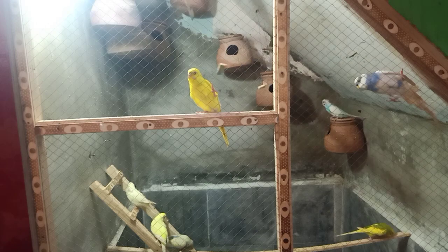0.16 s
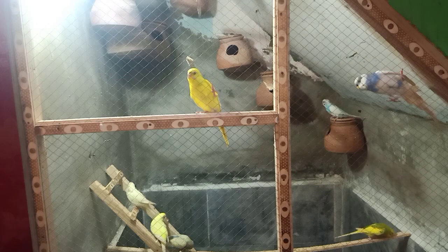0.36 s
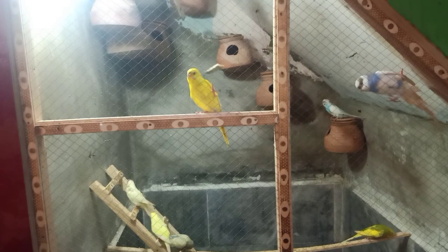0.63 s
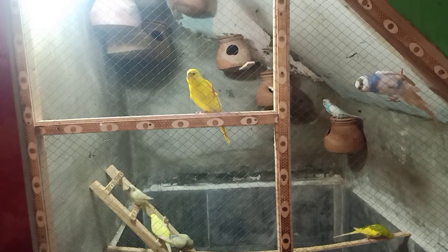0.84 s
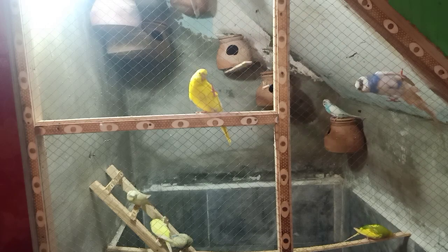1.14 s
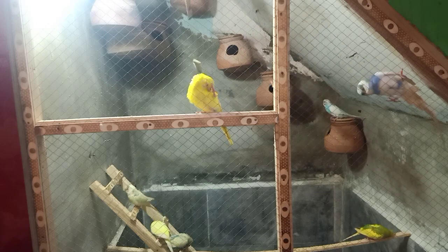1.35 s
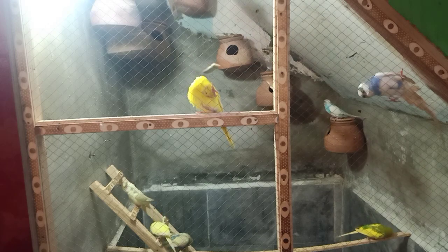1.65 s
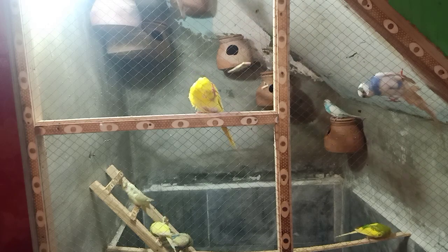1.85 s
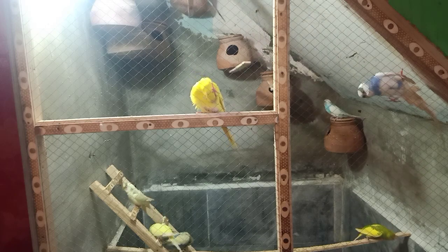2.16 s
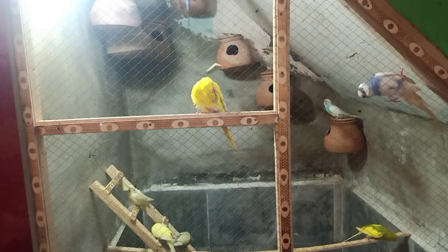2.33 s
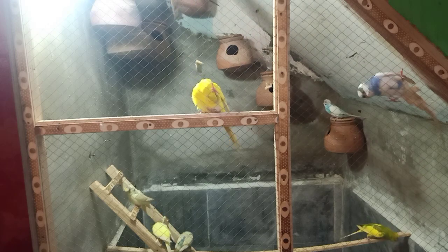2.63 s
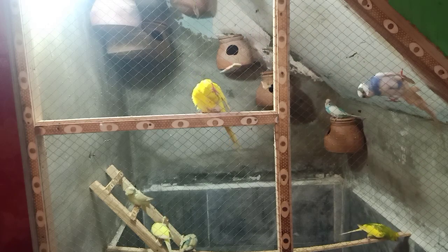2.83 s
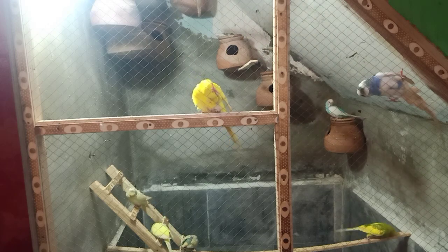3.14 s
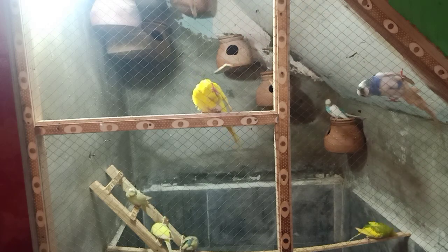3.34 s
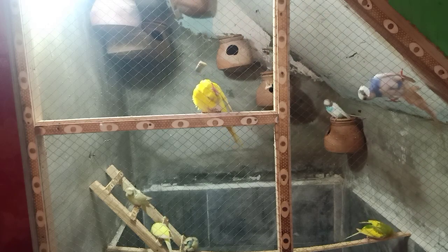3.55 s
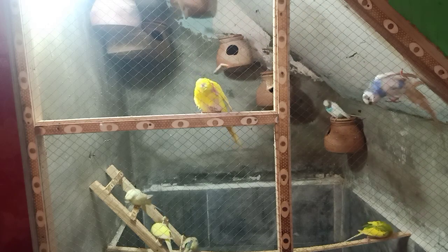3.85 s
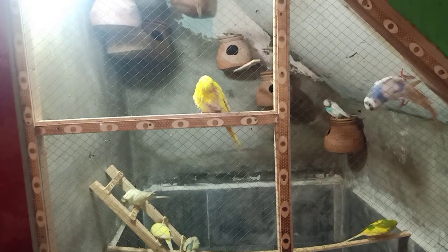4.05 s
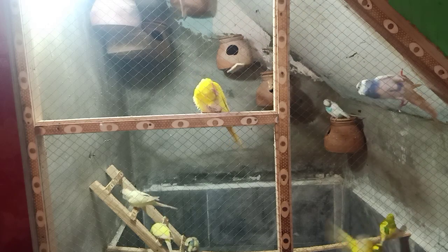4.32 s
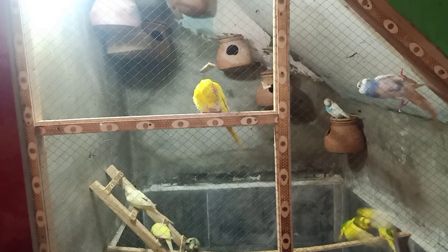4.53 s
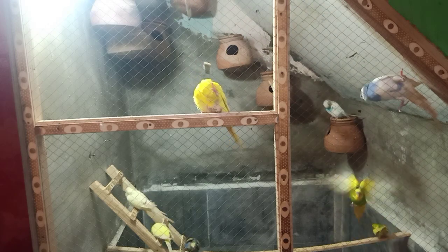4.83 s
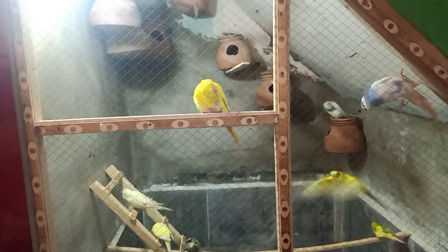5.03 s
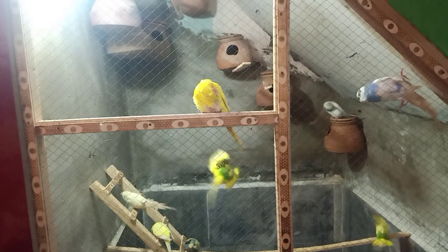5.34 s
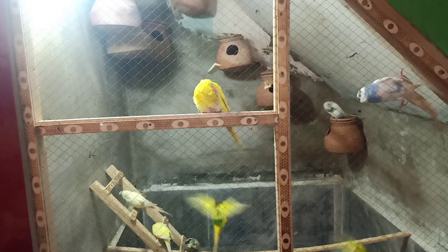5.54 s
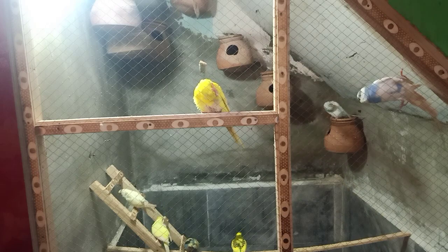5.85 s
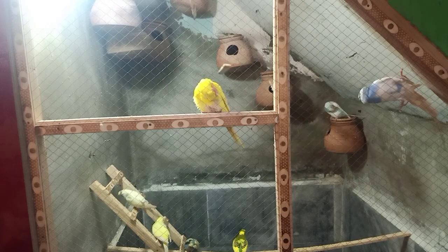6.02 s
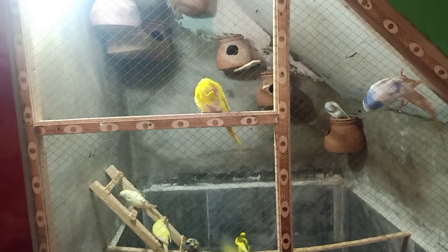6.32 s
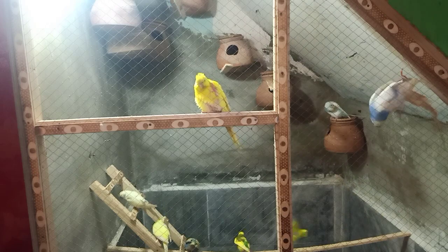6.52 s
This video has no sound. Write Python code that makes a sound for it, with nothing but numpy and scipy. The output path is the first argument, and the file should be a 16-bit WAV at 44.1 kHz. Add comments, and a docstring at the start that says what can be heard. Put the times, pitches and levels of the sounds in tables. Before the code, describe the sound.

Budgerigars chirp, rasp and cluck in a small echoing aviary, then call louder as wings flutter, over a faint hum.

```python
"""Budgerigars call in a small, hard-walled aviary, over a faint machine hum and a wash of distant noise.
First a bird warbles and rasps: its voice organ, the syrinx, sings for a whistle and slaps shut for a rasp.
Soft chirps and rasps follow, then two runs of clucks with a brief flutter of wings between them.
From about 4.4 s come a longer warble, harsh rasps and a burst of high chirps, while birds flutter
across the cage to the end, with puffs of air and a few scuffs of feathers and claws."""
import sys
import numpy as np
from scipy import signal
from scipy.fft import rfft, irfft, next_fast_len
from scipy.io import wavfile
from scipy.ndimage import uniform_filter1d

SR = 44100
rng = np.random.default_rng(int(sys.argv[2]) if len(sys.argv) > 2 else 0)


def to_wav(sig):
    """Store sig (one row per channel, or 1-D mono) as 16-bit WAV at the path in sys.argv[1].

    Samples outside -1..1 are clipped; the rate is SR.
    """
    pcm = np.clip(np.atleast_2d(sig), -1, 1) * 32767
    pcm = np.round(pcm).astype(np.int16)
    wavfile.write(sys.argv[1], SR, pcm.T)  # frames by channels


N = 294588

# tone of the birds' calls at the microphone, dull above 7 kHz: f/Hz, level/dB
CALL_TONE = [(500, -48), (1200, -26.5), (2200, -6.5), (3150, -3.5), (4150, -5), (5400, -6.5), (6150, -1.5),
             (6900, -11), (7800, -29), (9400, -37.5), (11800, -39), (15000, -37)]
# bursts of wing beats: t/s, length/s, air puffs/dB, feather whirr/dB
WING_BURSTS = [(3.10, .33, -65, -55.5), (4.379, 0.43, -51.5, -70), (4.651, 0.64, -52.5, -72),
               (5.295, 0.21, -56, -70), (5.448, 0.24, -65, -52), (5.611, .36, -53, -50.5),
               (5.909, 0.42, -54.5, -54), (6.269, 0.33, -57.5, -54), (6.503, 0.17, -64, -56)]


def whistle(hz, level_db, rough, overtones_db, even_db=-7):
    """The syrinx sings an almost pure, quavering tone; when pressed it buzzes and hisses."""
    size = len(hz)
    quaver = 0.028 * (0.48 + 2.02 * rough) * wander(size, 300)
    phase = phase_of(hz * (1 + quaver))
    buzz = 1 + 0.25 * rough * np.sin(phase_of(850 * (1 + 0.312 * wander(size, 332))))
    # the windpipe favours odd multiples of the pitch; even_db turns the even ones down or up
    overtones = sum(gain_of(read(CALL_TONE, k * hz) + even_db * (k % 2 == 0)) * np.cos(k * phase)
                    for k in range(2, 5))
    tone = np.sqrt(2) * np.cos(phase) + 1.21 * gain_of(overtones_db) * overtones
    hiss = rough * gain_of(-11) * coloured(rng.standard_normal(size), CALL_TONE, bright_db=2)
    flicker = steadied(gain_of(6.2 * rough * wander(size, 150)))
    note = gain_of(level_db) * (tone * buzz + hiss) * flicker * signal.windows.tukey(size, .06)
    return signal.sosfilt(signal.butter(6, 1600, "high", fs=SR, output="sos"), note)


def warbles():
    """Whistles that swell as they slide to a low note, then flip between two notes, ever rougher."""
    # t/s, length/s, level/dB, first pitch/Hz, low note/Hz, high note/Hz, slide/s,
    # curve (1 is straight, more lands softly), flip rate/Hz, roughness 0-1, overtones/dB
    calls = [(0.55, .111, -19, 4750, 3275, 4007, .023, 0.93, 26, 0.11, -3),
             (4.388, 0.249, -17.5, 1451, 2233, 3020, .082, 1.9, 11.1, .22, -12)]
    snap, sag_per_s, fade_db_per_s = 1.72, 0.703, 89
    for s, length, db, first_hz, low_hz, high_hz, slide_s, curve, flip_hz, rough, overtones_db in calls:
        t = np.arange(0, length, 1 / SR)
        slide = np.maximum(1 - t / slide_s, 0)
        swing = -np.cos(2 * np.pi * flip_hz * np.maximum(t - slide_s, 0))
        high = .5 + .5 * np.tanh(snap * swing) / np.tanh(snap)  # lingers on each note
        base_hz = low_hz * (1 - sag_per_s * (t - slide_s))
        hz = base_hz + (first_hz - base_hz) * slide ** curve + (high_hz - base_hz) * high
        effort_db = -13 * slide - 2 * high + 3 * (t / length - .5)
        yield s, whistle(hz, db + effort_db, 2 * rough * t / length, overtones_db - fade_db_per_s * t)


def chirps():
    """Short whistles: each is one straight glide in pitch, loudest in the middle."""
    # t/s, length/s, level/dB, first pitch/Hz, last pitch/Hz, roughness 0-1, overtones/dB
    calls = [(.93, 0.033, -43, 1620, 1463, 0.36, -25), (1.035, 0.098, -48, 1780, 2320, 0.73, -26),
             (1.072, 0.027, -41.5, 4157, 4480, .75, -25), (1.785, 0.017, -32.5, 2364, 2210, 0, -36),
             (1.809, 0.05, -36.5, 2210, 2060, 0.22, -37), (2.752, 0.036, -37, 2205, 2487, 0.4, -0.5),
             (2.821, 0.027, -38.5, 2077, 2100, 0.3, 1), (4.004, 0.058, -43, 2237, 2320, 0, -6),
             (4.067, .075, -43, 2377, 2434, 0.3, -11), (4.933, 0.0047, -17.5, 5400, 6000, 0.3, -37),
             (5.827, 0.028, -36, 3200, 2990, 0.8, 4), (5.868, 0.0385, -27.5, 3050, 3240, 0.85, -25),
             (5.843, 0.034, -22.5, 4910, 4780, 0.2, -32), (5.847, .018, -20, 6250, 6320, 0.03, -40),
             (5.878, 0.027, -15.5, 6240, 6270, 0.41, -40)]
    for s, length, level_db, first_hz, last_hz, rough, overtones_db in calls:
        progress = np.linspace(0, 1, round(length * SR))
        hz = first_hz + (last_hz - first_hz) * progress
        arch_db = -5 * (2 * progress - 1) ** 2
        yield s, whistle(hz, level_db + arch_db, rough, overtones_db, even_db=4.5)


def rasps(slaps_per_s=175, slap_s=0.00082, leak=0.034, pitch_hz=3050):
    """The syrinx slaps shut at an uneven rate; each slap is a burst of shaky tone and air."""
    # t/s, length/s, rise/s, level/dB, treble lift/dB, tuning (multiplies pitch and tone frequencies)
    calls = [(0.598, .068, 0.048, -26.5, -27, 0.86), (1.959, .026, 0.0048, -28.5, 1, 0.98),
             (2.173, 0.11, 0.022, -31.5, -1, .95), (4.448, .052, 0.012, -22.5, 3, 1.0),
             (4.627, 0.084, 0.021, -20, 6, 1.005), (4.939, 0.023, .003, -21, 0, 1.08),
             (4.963, .058, 0.027, -21.5, 6, 1.004), (5.276, 0.041, 0.0054, -21, 2, .96),
             (5.315, 0.049, 0.035, -20, 5, 1.02), (5.824, 0.082, 0.044, -21.5, 8.5, 0.93)]
    for s, length, rise_s, level_db, bright_db, tuning in calls:
        effort_db = level_db + envelope(length, rise_s, from_db=-7, sag_db_per_s=51, release_s=0.011)
        size = len(effort_db)
        slap_count = np.cumsum(slaps_per_s * np.exp(.25 * wander(size, 150))) / SR
        slaps = leak + np.exp(-(slap_count % 1) / slaps_per_s / slap_s)
        phase = phase_of(pitch_hz * tuning * (1 + 0.0762 * wander(size, 780)))
        breath = 0.41 * np.cos(phase) + 0.4 * np.cos(2 * phase) + 0.87 * rng.standard_normal(size)
        dull_db = .9 * (level_db + 19)  # gentle slaps lack the highest treble
        rasp_tone = [(hz * tuning, db + dull_db * (hz > SR / 4)) for hz, db in CALL_TONE]
        voice = steadied(coloured(slaps * breath, rasp_tone, bright_db))
        yield s, gain_of(effort_db) * voice * signal.windows.tukey(size, .02)


def clucks(glide=0.305, jitter=0.055, ring_db=11.5, ring_width_hz=700):
    """Brief, low, rough notes that slide upward while the throat rings at one frequency."""
    # t/s, level/dB, length/s, pitch/Hz, throat ring/Hz, treble lift/dB
    calls = [(1.74, -43, 0.026, 609, 2160, -35), (2.415, -39.5, 0.034, 761.5, 2130, 6),
             (2.552, -41.5, 0.023, 846, 1900, 3), (2.613, -30.5, 0.02, 1181, 4290, 2.5),
             (2.692, -34.5, 0.025, 1077, 3450, 2), (2.722, -50, 0.013, 1123, 3320, 15),
             (2.88, -36.5, 0.039, 1303, 1920, 7.5), (3.886, -40, 0.023, 1072, 1200, 1),
             (3.939, -36.5, 0.02, 1044, 3130, 10), (4.004, -30, 0.013, 1100, 3500, 2),
             (4.063, -33, 0.0173, 1089, 4500, -1), (4.133, -37.5, 0.007, 1130, 3930, 1),
             (4.182, -29.5, 0.011, 1056, 3500, 3.5), (4.258, -34.5, 0.018, 1077, 3200, 0),
             (4.33, -32.5, .028, 1078, 2820, 4.5), (4.389, -35.5, 0.038, 1192, 3170, 16)]
    # tone of the clucks at the microphone, dull above 7 kHz: f/Hz, level/dB
    cluck_tone = [(100, -63), (600, -15.5), (1100, -4.5), (1700, -5), (2400, -2), (3300, -2), (4300, -5.5),
                  (5300, -9.5), (6200, -8), (7200, -24.5), (8500, -33), (11000, -45.5), (15000, -47)]
    for s, level_db, length, pitch_hz, ring_hz, bright_db in calls:
        size = round(length * SR)
        progress = np.linspace(0, 1, size)
        phase = phase_of(pitch_hz * (1 + glide * (progress - .5) + jitter * wander(size, 430)))
        voice = evened(sum(np.cos(k * phase) for k in range(1, 12))) + rng.standard_normal(size)
        voice *= gain_of(7.4 * wander(size, 450))  # the note crackles
        ring = signal.lfilter(*signal.iirpeak(ring_hz, ring_hz / ring_width_hz, SR), voice)
        voice += (gain_of(ring_db) - 1) * ring
        swell = np.sin(np.pi * progress ** 0.94)  # opens a little faster than it closes
        yield s, gain_of(level_db) * evened(coloured(voice, cluck_tone, bright_db) * swell)


def flurry(length):
    """Strength of a burst of flapping: the first wing beats are the hardest."""
    level_db = envelope(length, rise_s=0.044, from_db=-14, sag_db_per_s=23.5, release_s=0.035)
    return gain_of(level_db) * signal.windows.tukey(len(level_db), .05)


def wings(strength, spectrum, depth_db, beats_per_s=21):
    """Stirred air that swells with every wing beat."""
    size = len(strength)
    beat = np.sin(phase_of(beats_per_s * (1 + 0.12 * wander(size, 11))))
    air = coloured(rng.standard_normal(size), spectrum)
    return strength * evened(air * gain_of(depth_db * beat))


def air_puffs():
    """Wing beats push low puffs of air at both microphones, nearly alike."""
    # the deep sound of pushed air: f/Hz, level/dB
    air = [(20, -34), (50, -19.5), (90, -4), (140, -19), (250, -28.5), (1000, -44), (4000, -92)]
    shared, apart = np.zeros((2, N))
    for track in (shared, apart):
        track += played((s, wings(gain_of(air_db) * flurry(length), air, depth_db=5.5))
                        for s, length, air_db, _ in WING_BURSTS)
    return shared + gain_of(-17.5) * np.array([apart, -apart])


def whirrs(note_hz=186, waver=.045):
    """Fluttering feathers make a rush of air around a soft, unsteady low note."""
    # air rushing past feathers: f/Hz, level/dB
    air = [(40, -33), (110, -3), (160, -16), (230, -14), (480, -17.5), (900, -22.5), (2500, -30.5),
           (6000, -37), (8500, -66)]
    for s, length, _, level_db in WING_BURSTS:
        strength = gain_of(level_db) * flurry(length)
        size = len(strength)
        rush = wings(strength, air, depth_db=2.5)
        note = np.sin(phase_of(note_hz * (1 + waver * wander(size, 29))))
        yield s, rush + strength * gain_of(3.4 * wander(size, 21)) * note


def scuffs():
    """Short, grainy brushes of feathers or claws."""
    # t/s, level/dB, length/s
    brushes = [(0.961, -60, 0.023), (3.117, -55.5, 0.075), (5.475, -42.5, 0.028), (5.68, -62.5, 0.072),
               (6.41, -60, 0.027), (6.565, -46.5, 0.015)]
    # the tone of the brushing: f/Hz, level/dB
    feathers = [(200, 5.5), (1000, 5.5), (2500, 7.5), (4200, -12), (6200, 12.5), (7500, -10), (9000, -22),
                (15000, -19)]
    for s, level_db, length in brushes:
        size = round(length * SR)
        grains = rng.standard_normal(size) * gain_of(16 * wander(size, 403))
        yield s, gain_of(level_db) * coloured(grains * signal.windows.tukey(size, .5), feathers)


def aviary(x, direct_db, room_db, lag_s=.00009):
    """Direct sound, lag_s later at the right microphone, plus dense echoes from the close walls."""
    # how long echoes take to fade by 60 dB: f/Hz, time/s
    ring_times = [(200, 0.28), (1500, 0.89), (3300, 0.69), (6200, 0.67), (11000, 0.37)]
    slots = np.arange(130, SR - 20, 20)  # one echo falls at random in every 20 samples
    arrivals = slots + rng.integers(0, 20, (2, len(slots)))
    bounces = np.zeros((2, SR))
    np.put_along_axis(bounces, arrivals, rng.choice([-1., 1.], arrivals.shape), 1)
    hz, t, bands = signal.stft(paired(*bounces), SR, nperseg=256)
    fade = gain_of(-60 * t / read(ring_times, hz)[:, None])
    early_boost = 1 + 1.77 * np.exp(-t / 0.0099)
    tail = signal.istft(bands * fade * early_boost, SR, nperseg=256)[1]
    echoes = signal.fftconvolve(x[None], tail / np.linalg.norm(tail[0]), axes=1)[:, :N]
    direct = np.array([x, np.roll(x, round(lag_s * SR))])
    return gain_of(direct_db) * direct + gain_of(room_db) * echoes


def machine_hum(waver=0.00099):
    """A machine hums a few faint tones whose pitches waver together."""
    # f/Hz, left level/dB, right level/dB
    tones = [(535.4, -56, -99.5), (1073, -70, -61), (1607, -67, -58.5), (1835, -65, -89.5),
             (2160, -98, -60), (2686, -99.5, -64.5)]
    clock = np.cumsum(1 + waver * wander(N, 6)) / SR
    hum = np.zeros((2, N))
    for hz, left_db, right_db in tones:
        tone = np.sqrt(2) * np.sin(2 * np.pi * hz * clock)
        hum += gain_of([[left_db], [right_db]]) * gain_of(.5 * wander(N, 15)) * tone
    return hum


def distant_noise(level_db=-52.5, drift_db=1.35):
    """A wash of far-off noise whose level drifts a little, each frequency band on its own."""
    # the tone of the wash: f/Hz, level/dB
    spectrum = [(30, -19), (65, -13), (108, 2.5), (150, -6), (350, -2), (480, 2.5), (660, -2.5),
                (1100, -2.5), (1750, -4.5), (2350, 2), (4200, -10), (6200, -11.5), (7300, -20), (8400, -47),
                (15000, -44.5)]
    wash = paired(*(coloured(rng.standard_normal(N), spectrum) for ear in range(2)))
    bands = signal.stft(wash, nperseg=1024)[2]
    drift = uniform_filter1d(rng.standard_normal(bands.shape[1:]), size=6, axis=0)  # smooth in frequency
    drift = evened(uniform_filter1d(drift, size=11, axis=1))  # and in time
    wash = signal.istft(bands * gain_of(drift_db * drift), nperseg=1024)[1][:, :N]
    return gain_of(level_db + .5 * wander(N, 4.3)) * evened(wash)


def low_swells(centre_hz=300, spread_hz=19):
    """A narrow band of low noise wells up softly and sinks back."""
    # t/s, length/s, level/dB
    swells = [(1.0, 0.41, -62.5), (1.777, 0.37, -64.5), (2.281, 0.185, -61)]
    for s, length, level_db in swells:
        t = np.arange(0, length, 1 / SR)
        band = wander(len(t), spread_hz) * np.sqrt(2) * np.sin(2 * np.pi * centre_hz * t)
        yield s, gain_of(level_db) * band * np.sin(np.pi * t / length)


def paired(a, b):
    """Turns two unrelated signals into sound from all around, alike in the bass at both microphones."""
    # f/Hz, left-right likeness 0-1
    likeness = [(50, 1), (150, 0.86), (300, 0.78), (600, 0.18), (2000, 0), (8000, 0)]
    same = read(likeness, np.fft.rfftfreq(len(a), 1 / SR))
    right = irfft(same * rfft(a) + np.sqrt(1 - same ** 2) * rfft(b), len(a))
    return np.array([a, right])


def envelope(length, rise_s, from_db, sag_db_per_s, release_s, end_db=-18):
    """Level in dB of one effort: it rises to 0, sags as it is held, and is let go."""
    t = np.arange(0, length, 1 / SR)
    rise = np.maximum(1 - t / rise_s, 0)
    fall = np.maximum(1 - (length - t) / release_s, 0)
    return from_db * rise - sag_db_per_s * np.maximum(t - rise_s, 0) + end_db * fall


def coloured(x, spectrum, bright_db=0, treble_hz=4300):
    """Shapes the tone of x by a table and lifts its treble by bright_db, at an average level of 1."""
    n = next_fast_len(len(x) + 1024)
    hz = np.fft.rfftfreq(n, 1 / SR)
    shaped = rfft(x, n) * gain_of(read(spectrum, hz))
    below = 1 / (1 + (hz / treble_hz) ** 8)
    lift = below + gain_of(bright_db) * (1 - below)
    return evened(irfft(shaped * lift, n)[:len(x)])


def wander(size, hz):
    """A smooth random wobble, about 1 in size, that changes up to hz times a second."""
    n = next_fast_len(size + SR // 4)
    f = np.fft.rfftfreq(n, 1 / SR)
    return evened(irfft(rfft(rng.standard_normal(n)) / (1 + (f / hz) ** 4), n))[:size]


def phase_of(hz):
    """The running angle of a wave whose pitch changes."""
    return 2 * np.pi * np.cumsum(hz) / SR


def gain_of(db):
    """Turns decibels into a multiplier."""
    return 10 ** (np.asarray(db) / 20)


def evened(x):
    """Scales x to an average (rms) level of 1."""
    return x / np.sqrt(np.mean(x ** 2) + 1e-20)


def steadied(x, size=700):
    """Holds the level near 1 from moment to moment, keeping the fast grain."""
    return x / np.sqrt(np.abs(uniform_filter1d(x ** 2, size)) + 1e-12)


def read(points, hz):
    """Reads between the rows of a frequency table, with octaves evenly spaced."""
    f, value = np.transpose(points)
    return np.interp(np.log(hz + 1), np.log(np.sort(f) + 1), value)


def played(sounds):
    """Lays (start time, sound) pairs on one track."""
    track = np.zeros(N)
    for s, sound in sounds:
        part = track[round(s * SR):][:len(sound)]
        part += sound[:len(part)]
    return track


def scene():
    """Voices and wings in the aviary, over the background."""
    # how directly the rasps reach the microphones as the birds turn and move: t/s, level/dB
    facing = [(1.97, -8), (2.2, 2.5), (4.68, -12.5), (4.97, -3), (5.33, -16), (5.88, -14)]
    facing_db = np.interp(np.arange(N) / SR, *np.transpose(facing))
    notes = played(warbles()) + played(chirps())
    mix = aviary(notes, direct_db=-5.5, room_db=-3, lag_s=-.00005) * gain_of([[-1.2], [1.2]])
    mix += aviary(played(rasps()), facing_db, room_db=-0.02, lag_s=.00015) * gain_of([[.3], [-.3]])
    mix += aviary(played(clucks()), direct_db=-10, room_db=-0.14, lag_s=.00005)
    mix += aviary(played(whirrs()), direct_db=-0.5, room_db=-1) + air_puffs()
    mix += aviary(played(scuffs()), direct_db=-6, room_db=3.5)
    return mix + machine_hum() + distant_noise() + played(low_swells())


def record(dry, edge_hz=15600):
    """The recorder cuts off the very highest treble."""
    low_pass = signal.firwin(511, edge_hz, window=("kaiser", 9), fs=SR)
    return signal.oaconvolve(dry, low_pass[None], "same")


dry = scene()
out = record(dry)
to_wav(out)
```